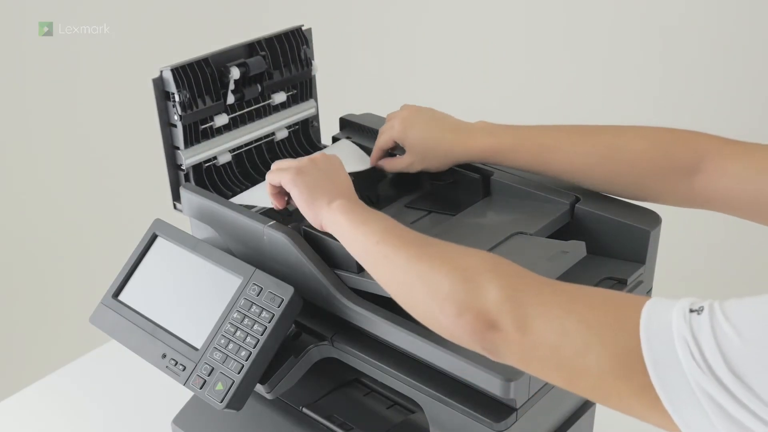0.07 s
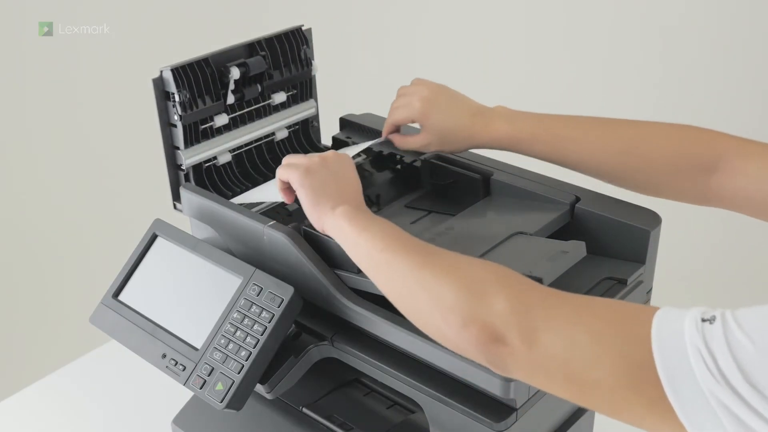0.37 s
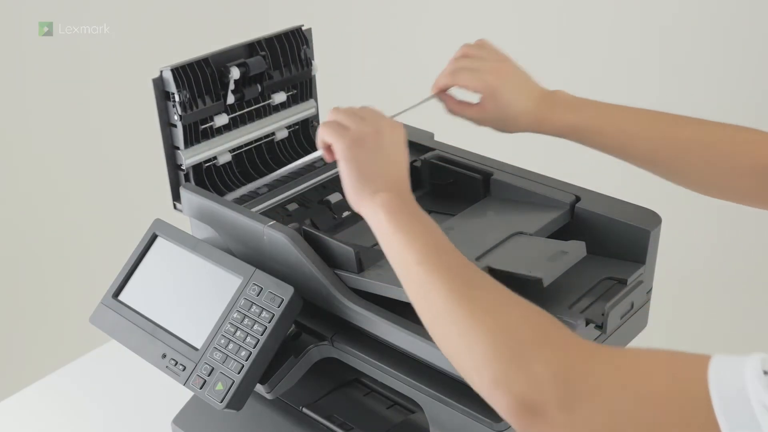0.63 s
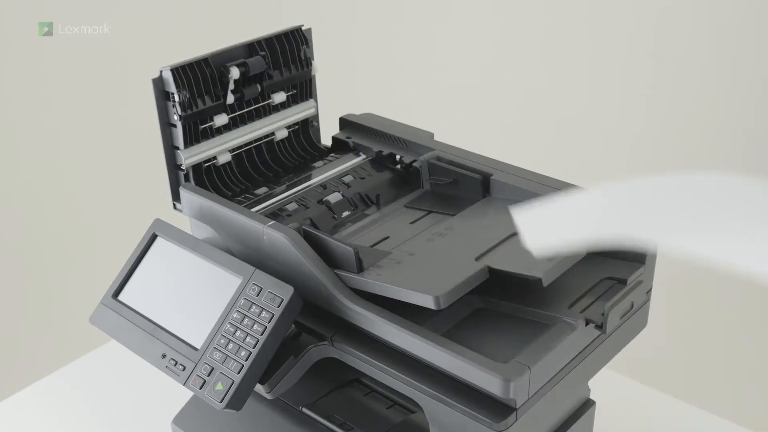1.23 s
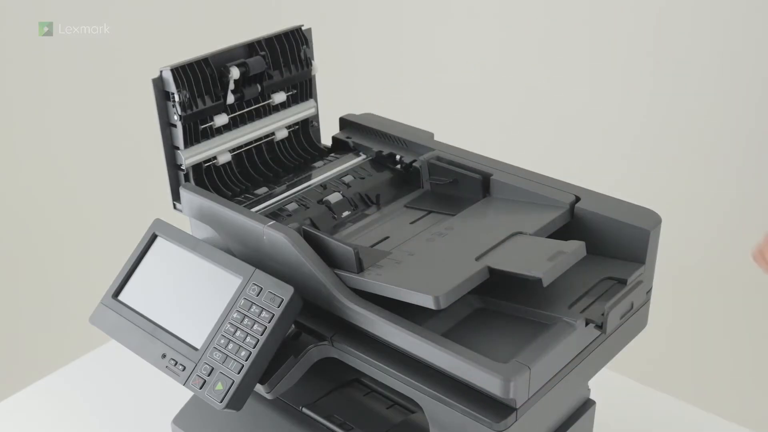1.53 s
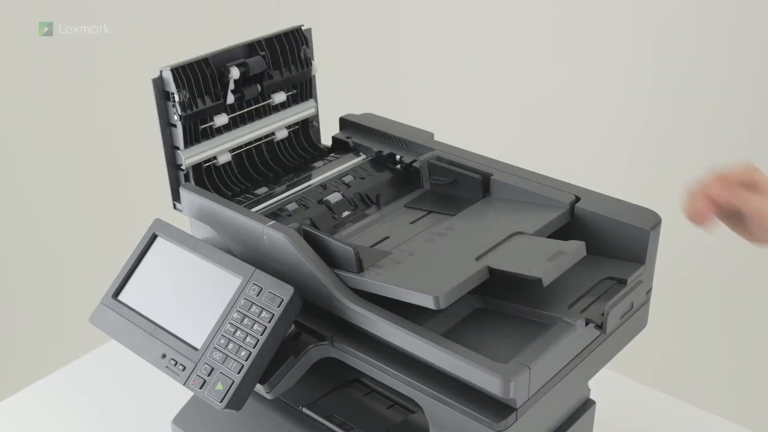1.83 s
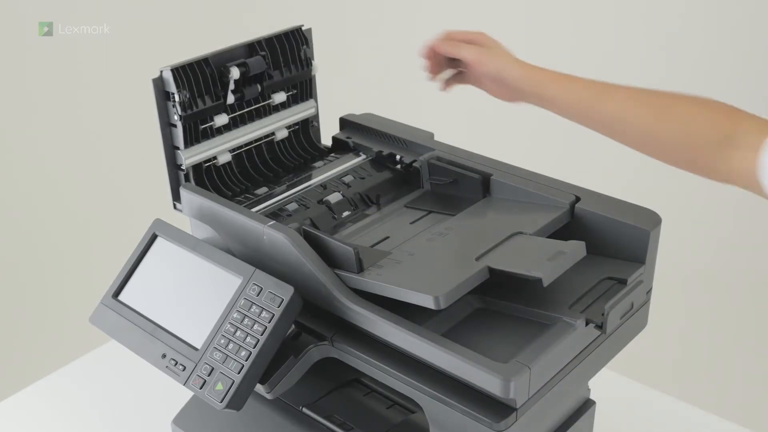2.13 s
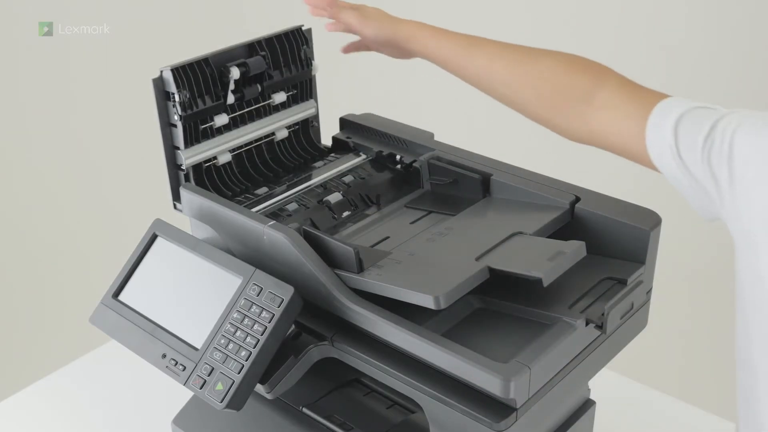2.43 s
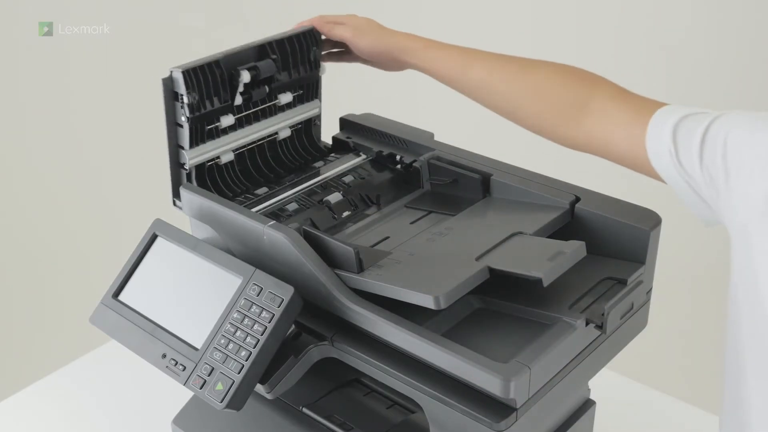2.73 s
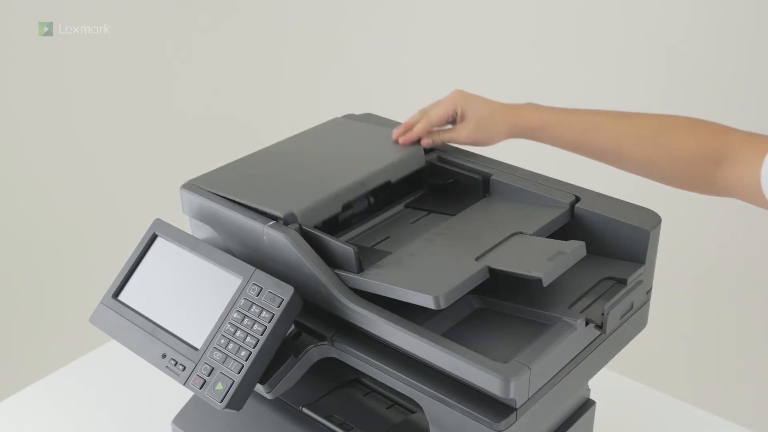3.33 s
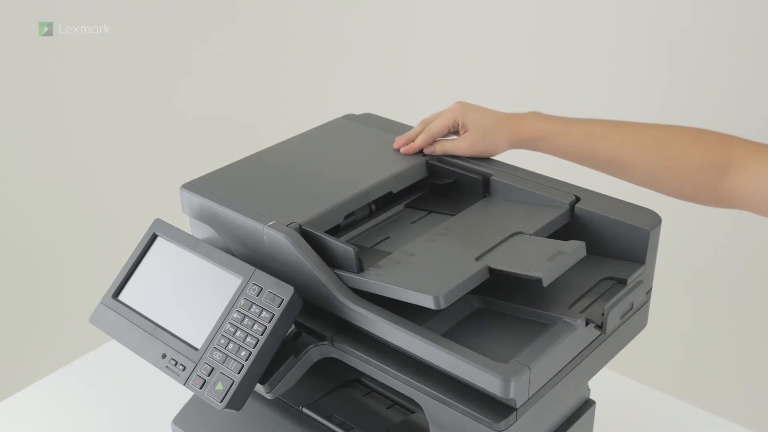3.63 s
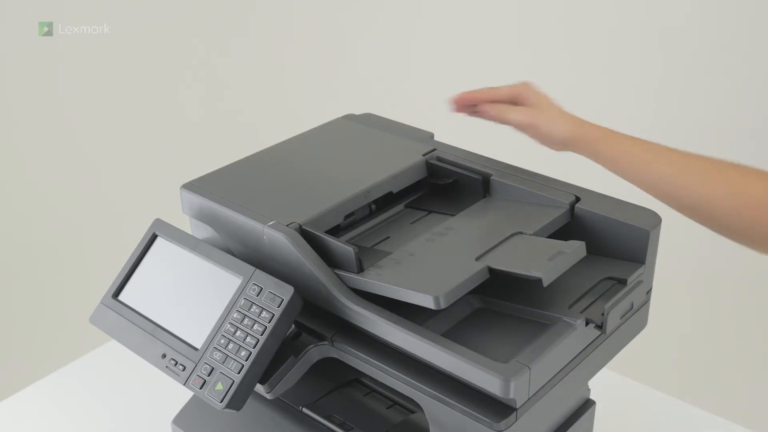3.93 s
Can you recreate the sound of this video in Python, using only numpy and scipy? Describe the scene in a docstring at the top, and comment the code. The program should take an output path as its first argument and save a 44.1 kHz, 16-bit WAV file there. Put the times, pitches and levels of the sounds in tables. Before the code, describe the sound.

A printer's plastic cover clacks shut after a jam is cleared. First paper scrapes softly through the rollers and flaps free, then come light knocks, a brief creak and the closing clacks, close by over low office ventilation.

```python
"""Close by, in a small office, over a steady low rumble of ventilation, a printer is cleared of a jam.
First the sheet is drawn through the feeder's rollers: its fibres catch and slip in a scrape, and it
buckles with short snaps. Near 1 s its edge flicks out and it flaps free. A hand then takes the plastic
cover with light knocks, and near 2.8 s the hinge creaks by stick-slip friction. At 3.3 s the cover drops
onto the latch; at 3.65 s it is pressed shut with a clack that rings the cover and the hollow housing."""
import sys
import numpy as np
from scipy import signal
from scipy.fft import rfft, irfft
from scipy.io import wavfile

SR = 44100
rng = np.random.default_rng(int(sys.argv[2]) if len(sys.argv) > 2 else 0)


def store_pcm(level_fs):
    """Save levels as 16-bit WAV."""
    pcm = np.round(np.clip(level_fs, -1, 1) * 32767).astype(np.int16)
    wavfile.write(sys.argv[1], SR, np.atleast_2d(pcm).T)


N = 176400
T = np.arange(N) / SR
RING_T = T[:SR // 2]  # time axis of one decaying event

# ventilation spectrum (f/Hz, level/dB)
VENT_SPECTRUM = [(12, -38), (25, -18.5), (50, -6), (125, -5), (180, -13.5), (240, -14.5), (300, -17.5),
                 (440, -23.5), (620, -31.5), (800, -37.5), (1100, -44.5), (2700, -53.5), (10000, -61),
                 (15800, -73)]
# reverberation time of the office (f/Hz, t60/s)
OFFICE_T60 = [(100, 1), (500, 0.5), (2000, 0.45), (5000, 0.4), (9000, 0.4), (16000, 0.33)]
# brushes of paper, skin and air (peak t/s, rise/s, fall/s, level/dB, centre f/Hz, width/octaves)
BRUSH_SWELLS = [(.34, 0.15, 0.039, -71.5, 2780, 0.91), (.445, 0.075, 0.024, -57.5, 850, 0.67),
                (0.584, 0.012, 0.016, -59, 1210, 0.34), (.632, 0.0041, 0.041, -60, 1390, 0.69),
                (.665, 0.0026, 0.0034, -59.5, 2670, 1.4), (.82, 0.031, 0.073, -62, 833, 0.69),
                (0.849, .04, 0.14, -56, 43.7, 1), (0.847, 0.0023, 0.0074, -63, 3420, 0.78),
                (1.044, .004, 0.024, -73.5, 2460, 1.02), (1.125, .03, 0.02, -74.5, 2040, 0.92),
                (1.184, 0.0095, .009, -61.5, 3150, 0.83), (1.421, 0.13, 0.12, -70.5, 2040, 1.07),
                (1.58, 0.09, 0.028, -74.5, 880, 0.47), (2.262, 0.0049, 0.097, -83, 6300, 0.31),
                (2.262, 0.0054, .16, -86, 2430, 0.25), (2.795, 0.0042, 0.0048, -49.5, 3840, 0.54),
                (3.585, 0.0074, 0.071, -58.5, 900, 0.89)]
# faint squeaks of plastic (t/s, half length/s, level/dB, f/Hz)
PLASTIC_SQUEAKS = [(2.442, 0.057, -81, 2210), (3.219, 0.0096, -76, 1560), (3.509, 0.014, -78, 2300)]
# spectrum of the air pushed by the freed sheet (f/Hz, level/dB)
FLAP_SPECTRUM = [(15, -12), (35, 2.5), (70, 2.5), (130, 0), (210, -5), (300, -29), (600, -30), (2000, -55),
                 (10000, -74)]
# partials of the flicking edge (starting f/Hz, level/dB)
FLICK_PARTIALS = [(620, 0), (1000, -9), (1500, -9), (2100, -8)]
# buckling events of the sheet (t/s, level/dB, cutoff f/Hz, t60/s)
BUCKLES = [(.1752, -40.5, 2400, 0.025), (0.4626, -37, 13600, 0.026), (0.6876, -43.5, 7000, 0.048),
           (0.7597, -39.5, 3720, 0.031), (1.2599, -40, 2500, 0.023)]
# spectrum of a buckling snap (f/Hz, level/dB)
SNAP_SPECTRUM = [(100, -9), (400, -2), (800, -2), (1500, -4), (2400, -7.5), (4000, -7.5), (9000, -6.5),
                 (16000, -9.5)]
# resonances of the bowed sheet (f/Hz, width/Hz, level/dB relative to the snap spectrum)
SHEET_RESONANCES = [(784, 80, 8), (1246, 75, 6.5), (1750, 120, 3.5), (2320, 76, 8.5), (2900, 70, 7)]
# envelope of the sheet scraping through the rollers (t/s, level/dB)
SCRAPE_ENVELOPE = [(0.358, -76.5), (0.36, -46), (.41, -48.5), (.45, -44), (0.516, -46.5), (0.538, -61.5),
                   (.55, -52), (.565, -63.5), (.58, -54.5), (0.599, -60), (.615, -65.5), (.63, -62),
                   (.665, -64.5), (.68, -71), (.73, -64.5), (.75, -71), (.768, -70), (.776, -59)]
# spectrum of the scrape (f/Hz, level/dB)
SCRAPE_SPECTRUM = [(120, -34), (200, -6), (346, -12.5), (527, -3.5), (588, -6.5), (774, -3), (863, -3.5),
                   (1550, -9), (2280, -15), (2830, -9.5), (8640, -12), (10600, -20), (15800, -29.5)]
# envelope of the hinge creak (t/s, level/dB)
CREAK_ENVELOPE = [(2.771, -79), (2.788, -54), (2.799, -52), (2.808, -67), (2.818, -61), (2.845, -66),
                  (2.857, -65), (2.88, -77), (2.892, -68), (2.95, -84), (2.97, -71), (2.99, -104),
                  (3.025, -77.5), (3.09, -83.5)]
# hinge resonances (f/Hz, width/Hz, level/dB)
HINGE_RESONANCES = [(2297, 560, 6.5), (2870, 460, -4), (3365, 280, -2), (5440, 360, -4), (6510, 500, -13),
                    (11060, 1800, -6.5)]
# booms of the feeder's hollow body (t/s, level/dB, f/Hz, t60/s, attack/s)
BODY_THUDS = [(2.693, -49, 128, 0.095, 0.0064), (3.289, -39, 62.6, 0.16, 0.0076),
              (3.289, -37.5, 412, 0.084, 0.0026), (3.652, -32, 133.7, .25, 0.0022),
              (3.653, -48.5, 59.8, 0.22, 0.0035), (3.6545, -21, 886, .05, 0.0012),
              (3.6553, -22.5, 1026, 0.029, 0.0011), (3.711, -32, 149, 0.08, 0.0026)]
# spectrum of the housing's dense ring (f/Hz, level/dB)
HOUSING_SPECTRUM = [(30, -12.5), (70, -5), (130, -4), (220, -10.5), (400, -5.5), (510, -7), (600, -5.5),
                    (710, -10.5), (860, -4.5), (1080, -7), (1230, -8.5), (1400, -7.5), (1850, -10.5),
                    (2200, -10), (2950, -8), (3500, -11.5), (4600, -12.5), (6500, -14.5), (9000, -19.5),
                    (15800, -23.5)]
# decay time of that ring (f/Hz, t60/s)
HOUSING_T60 = [(100, 0.34), (400, 0.12), (1000, 0.068), (3000, 0.06), (7000, 0.047), (15000, 0.023)]
# clearest modes of the cover (f/Hz, level/dB, t60/s)
COVER_RESONANCES = [(385.5, -12.5, 0.36), (600, -5, 0.085), (640, -6.5, 0.17), (850, -4, 0.037),
                    (961, -14.5, 0.14), (1033, -2.5, .1), (1362, -8, .13), (1486, -14, 0.17),
                    (1655, -14, 0.15), (1878, -1.5, 0.084), (2580, -14.5, 0.16), (2980, -1.5, 0.0695),
                    (4110, -11.5, 0.034), (4625, -9, .05)]
# contacts of hand, hinge, cover and latch (t/s, level/dB, bass/dB, treble/dB, hollow/dB, t60 factor)
CONTACTS = [(1.692, -64.5, -1, -15, 5, 0.78), (1.857, -59, -35, -10, -8, 0.34),
            (2.473, -58.5, 10, -7.5, -6, 1.05), (2.485, -53.5, 1, -23, -4, 1.47),
            (2.662, -63, 21.5, -23, -9, 2.75), (2.693, -51, 11.5, -14, 5.5, 1),
            (2.794, -46, -22, -14, -17, 0.83), (2.854, -57, -10, -13, -2, 1.3),
            (3.055, -63.5, 5, -34, -7, 1.4), (3.237, -63.5, -18, -8, -6, 1.3),
            (3.2518, -60.5, -23, 4, -1, 2.5), (3.265, -43, -30, 16.5, 19.5, 0.68),
            (3.2856, -39, 2.5, 7, 7.5, .55), (3.292, -40.5, 11, 2, -6.5, 1.31),
            (3.335, -50.5, -3, -10, -4, 0.82), (3.629, -44.5, 4, 6.5, 4, 1), (3.637, -37, 7, 0, 0, 1),
            (3.6418, -30, -10.5, 9, -3.5, 2.7), (3.6462, -22, -9, -17.5, -5, 1.94),
            (3.652, -13, -18.5, 5.5, -0.5, 0.33), (3.6556, -18, -5, -3.5, 7.5, 1.02),
            (3.660, -23.5, -7.5, -1, -14.5, 1.2), (3.680, -30.5, -12.5, -0.5, 0.5, 0.58),
            (3.7115, -36.5, -5, -5, -5, 1.26), (3.941, -37.5, -5.5, -9.5, -5.5, 0.85),
            (3.98, -56.5, 10.5, -19.5, 2, 0.56)]


def amp(db):
    """Amplitude ratio of a level in decibels."""
    return 10 ** (np.asarray(db) / 20)


def unit(x):
    """Normalisation to an rms of 1."""
    return x / np.sqrt(np.mean(x ** 2))


def along(points, hz):
    """Interpolation of (f/Hz, value) points on a log-frequency axis."""
    p = np.array(points, float)
    return np.interp(np.log(hz + 1), np.log(p[:, 0]), p[:, 1])


def freqs(x):
    """Bin frequencies of a signal's Fourier transform."""
    return np.fft.rfftfreq(len(x), 1 / SR)


def shape(x, gain):
    """Minimum-phase filtering: folding the cepstrum gives a causal response with the given gain."""
    cepstrum = irfft(np.log(np.maximum(gain, 1e-5)), len(x))
    cepstrum[1:len(x) // 2] *= 2
    cepstrum[len(x) // 2 + 1:] = 0
    return irfft(rfft(x) * np.exp(rfft(cepstrum)), len(x))


def colour(x, points):
    """Filtering by a (f/Hz, level/dB) spectrum that conserves the power of white noise."""
    return shape(x, unit(amp(along(points, freqs(x)))))


def resonances(hz, peaks):
    """Gain of Lorentzian resonances (f/Hz, width/Hz, level/dB), added in power."""
    return np.sqrt(sum(amp(db) ** 2 / (1 + (2 * (hz - f) / width) ** 2) for f, width, db in peaks))


def decay(t60):
    """Exponential damping by 60 dB in t60 seconds."""
    return np.exp(-np.log(1000) * RING_T / t60)


def onset(rise_s):
    """Exponential approach to full amplitude."""
    return 1 - np.exp(-RING_T / rise_s)


def octave_bands(x, lowest_hz, count):
    """Decomposition into overlapping octave bands whose sum is the signal."""
    spectrum = rfft(x)
    octave = np.clip(np.log2((freqs(x) + 1) / lowest_hz), 0, count - 1)
    return [irfft(spectrum * np.maximum(1 - abs(octave - k), 0)) for k in range(count)]


def fading(t60s):
    """Frequency-dependent damping: each octave of a noise decays at its own rate."""
    bands = octave_bands(rng.standard_normal(len(RING_T)), lowest_hz=62.5, count=9)
    return sum(band * decay(along(t60s, 62.5 * 2 ** k)) for k, band in enumerate(bands))


def walk(rate_hz):
    """Slow random variation, interpolated between Gaussian values of unit spread."""
    return np.interp(T * rate_hz, np.arange(2048), rng.standard_normal(2048))


def envelope(points):
    """Amplitude along (t/s, level/dB) points, inaudible outside them."""
    s, db = np.array(points).T
    return amp(np.interp(T, s, db, left=-140, right=-140))


def add(out, s, x):
    """Superposition of x on out, starting at s seconds."""
    i = int(s * SR)
    out[i:i + len(x)] += x[:len(out) - i]


def ventilation(level_db=-59):
    """Broadband air noise, strongest at low frequencies: a rumble with a trace of hiss."""
    return amp(level_db + 0.24 * walk(1)) * unit(colour(rng.standard_normal(N), VENT_SPECTRUM))


def office(x, tail_db=-17, build_s=0.004, cutoff_hz=9000):
    """Reverberation: wall reflections add a diffuse, decaying tail to the direct sound."""
    tail = fading(OFFICE_T60) * (1 - np.exp(-(RING_T / build_s) ** 2))
    tail /= np.sqrt(np.sum(tail ** 2))
    tail = shape(tail, 1 / np.hypot(1, (freqs(tail) / cutoff_hz) ** 2))
    return x + amp(tail_db) * signal.fftconvolve(x, tail)[:N]


def brushes():
    """Sliding friction of paper and fingers on plastic, and stirred air, give swells of band noise."""
    out, hz = np.zeros(N), freqs(T) + 1
    for s, rise, fall, db, centre_hz, octaves in BRUSH_SWELLS:
        band = np.exp(-.5 * (np.log2(hz / centre_hz) / octaves) ** 2)
        swell = np.exp(-((T - s) / np.where(T < s, rise, fall)) ** 2)
        out += amp(db) * swell * unit(irfft(rfft(rng.standard_normal(N)) * band))
    return out * amp(2.0 * walk(88))


def squeaks(waver_hz=420):
    """Friction-induced oscillation: rubbed plastic gives brief tones of wavering phase."""
    out = np.zeros(N)
    for s, half_length, db, hz in PLASTIC_SQUEAKS:
        swell = np.exp(-((T - s) / half_length) ** 2)
        out += amp(db) * swell * np.sin(2 * np.pi * hz * T + 2 * walk(waver_hz))
    return out


def flap(start_s=.947, level_db=-34):
    """Air displacement: the sheet swings free and radiates a soft, low puff."""
    out = np.zeros(N)
    push = rng.standard_normal(len(RING_T)) * decay(t60=0.18) * onset(rise_s=0.0064)
    add(out, start_s, amp(level_db) * colour(push, FLAP_SPECTRUM))
    return out


def flick(start_s=.9355, level_db=-46, octave_fall_s=0.041, width_share=.6):
    """The edge leaves the rollers with a swish: random modulation broadens its falling partials."""
    out, swish = np.zeros(N), 0
    cycles_per_hz = np.cumsum(1 / (1 + RING_T / octave_fall_s)) / SR
    for hz, db in FLICK_PARTIALS:
        flutter = walk(hz * width_share) + 1j * walk(hz * width_share)
        glide = np.exp(2j * np.pi * hz * cycles_per_hz)
        swish += amp(db) * np.real(flutter[:len(RING_T)] * glide)
    add(out, start_s, amp(level_db) * swish * decay(t60=0.12) * onset(rise_s=0.0017))
    return out


def snaps():
    """Buckling: the sheet pops between curves, and a pulse and a brief rattle excite its resonances."""
    out, hz = np.zeros(N), freqs(RING_T)
    sheet = np.hypot(1, resonances(hz, SHEET_RESONANCES))
    for s, db, cutoff_hz, t60 in BUCKLES:
        push = rng.standard_normal(len(RING_T)) * decay(t60)
        push[0] -= 6.4  # the pulse that leads the rattle
        lowpass = 1 / np.sqrt(1 + (hz / cutoff_hz) ** 10)
        add(out, s, amp(db) * shape(colour(push, SNAP_SPECTRUM), lowpass * sheet))
    return out


def scrape(grains_per_s=5000, spread_db=3.5, flex_db=2.6, flex_hz=130, flutter_db=0.5):
    """Dry friction: paper fibres catch and slip as dense grains; flexing modulates each octave."""
    caught = rng.random(N) < grains_per_s / SR
    size = amp(spread_db * rng.standard_normal(N))
    grains = caught * size * np.sign(rng.standard_normal(N))
    rub = colour(unit(grains) + 1.12 * rng.standard_normal(N), SCRAPE_SPECTRUM)
    bands = octave_bands(rub, lowest_hz=400, count=6)
    flexed = sum(band * amp(flex_db * walk(flex_hz)) for band in bands)
    return unit(flexed) * envelope(SCRAPE_ENVELOPE) * amp(flutter_db * walk(90.6))


def creak(slips_per_s=260, spread_db=9.5, cutoff_hz=10700):
    """Stick-slip friction: as the cover starts to turn, uneven ticks excite the hinge's resonances."""
    hz = freqs(T)
    slip_rate = slips_per_s * amp(4 * walk(60))
    slips = np.diff(np.floor(np.cumsum(slip_rate) / SR), prepend=0)
    slips *= amp(spread_db * rng.standard_normal(N))
    ticks = signal.fftconvolve(slips, decay(t60=0.039))[:N] * rng.standard_normal(N)
    lowpass = 1 / np.hypot(1, (hz / cutoff_hz) ** 8)
    ring = shape(ticks, resonances(hz, HINGE_RESONANCES) * lowpass)
    return unit(ring) * envelope(CREAK_ENVELOPE)


def thuds():
    """Damped free vibration of the feeder's panels and cavity after the heavier blows."""
    out = np.zeros(N)
    for s, db, hz, t60, attack_s in BODY_THUDS:
        add(out, s, amp(db) * np.sin(2 * np.pi * hz * RING_T) * decay(t60) * onset(attack_s))
    return out


def cover_ring(t60_factor, detune=.012):
    """Modal superposition: the struck cover rings as damped sines of random sign and slight detuning."""
    ring = 0
    signs = np.sign(rng.standard_normal(len(COVER_RESONANCES)))
    for sign, (hz, db, t60) in zip(signs, COVER_RESONANCES):
        hz *= 1 + detune * rng.standard_normal()
        ring += sign * amp(db) * np.sin(2 * np.pi * hz * RING_T) * decay(t60 * t60_factor)
    return ring


def knocks(bass_hz=820, treble_hz=3470, hollow_hz=930, hollow_width_hz=290, modes_db=-13.52):
    """Impacts excite cover and housing; heavy ones carry bass and sound hollow, hard ones carry treble."""
    out, hz = np.zeros(N), freqs(RING_T)
    bass = 1 / (1 + (hz / bass_hz) ** 2)
    treble = 1 - 1 / (1 + (hz / treble_hz) ** 2)
    cavity = resonances(hz, [(hollow_hz, hollow_width_hz, 0)]) ** 2
    for s, db, bass_db, treble_db, hollow_db, t60_factor in CONTACTS:
        housing = colour(fading([(f, t60 * t60_factor) for f, t60 in HOUSING_T60]), HOUSING_SPECTRUM)
        blow = (housing + amp(modes_db) * cover_ring(t60_factor)) * onset(rise_s=0.00058)
        timbre = amp(bass_db * bass + treble_db * treble + hollow_db * cavity)
        add(out, s, amp(db) * shape(blow, timbre))
    return out


def scene():
    """Superposition: paper, then cover, reverberate in the office over the ventilation."""
    paper = scrape() + brushes() + snaps() + flick() + flap()
    cover = creak() + squeaks() + knocks() + thuds()
    return (office(paper + cover) + ventilation())[None]


def record(dry):
    """Band limiting: a steep elliptic low-pass removes the highest treble."""
    cutoff_hz = 15950
    return signal.sosfilt(signal.ellip(10, .2, 70, cutoff_hz, fs=SR, output="sos"), dry)


dry = scene()
out = record(dry)
store_pcm(out)
```